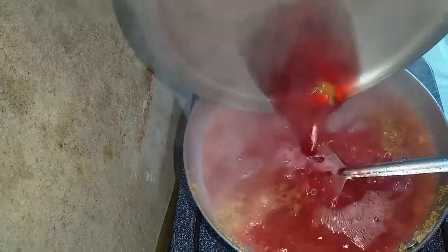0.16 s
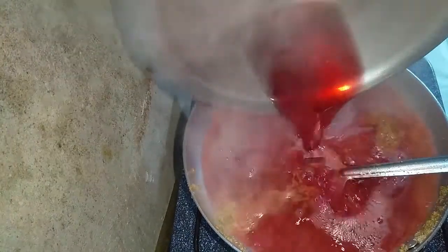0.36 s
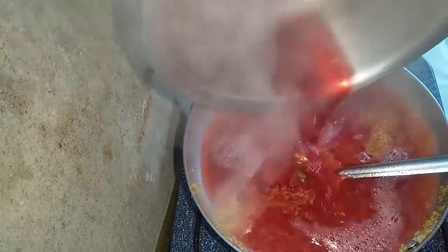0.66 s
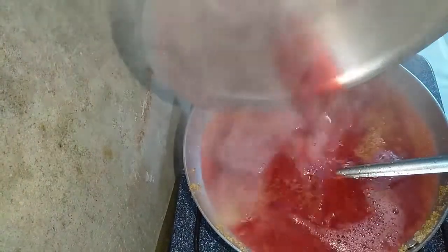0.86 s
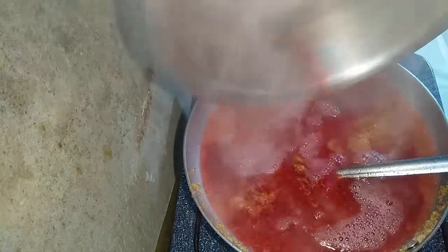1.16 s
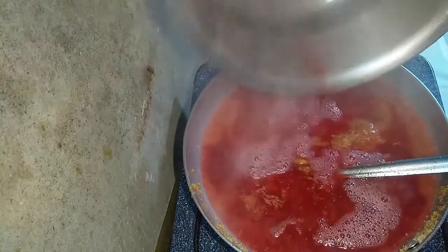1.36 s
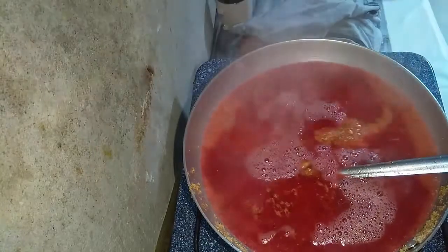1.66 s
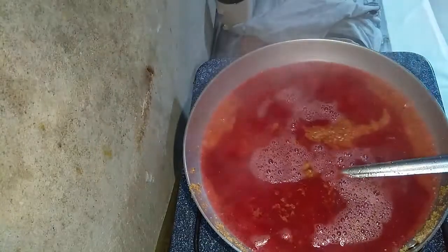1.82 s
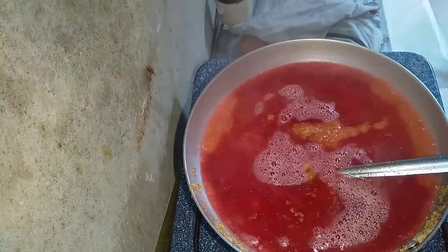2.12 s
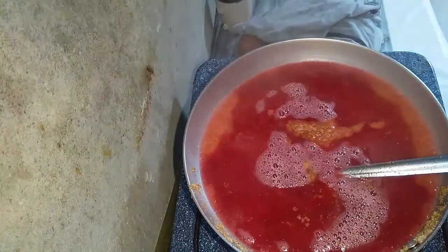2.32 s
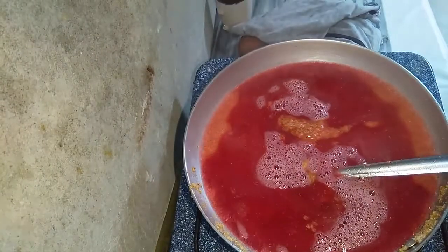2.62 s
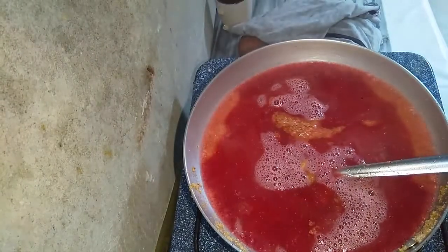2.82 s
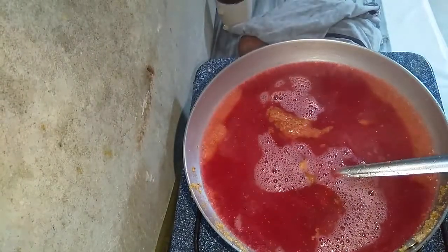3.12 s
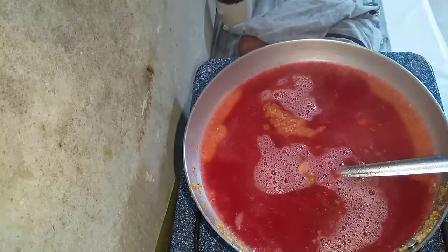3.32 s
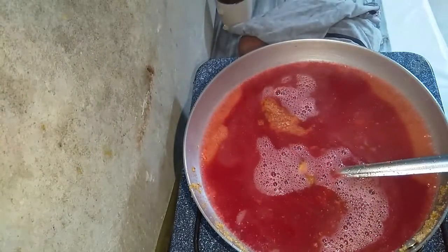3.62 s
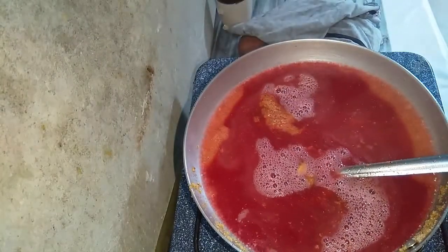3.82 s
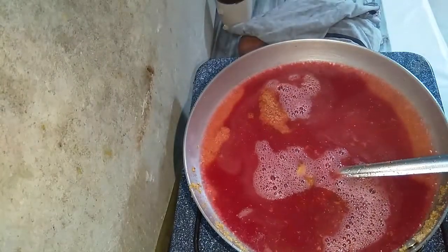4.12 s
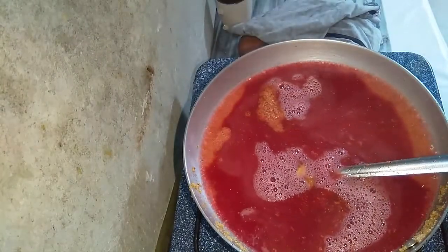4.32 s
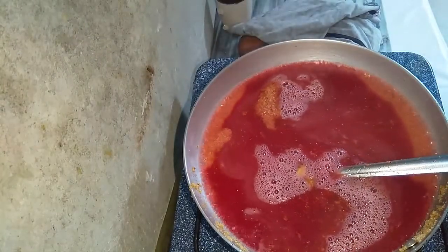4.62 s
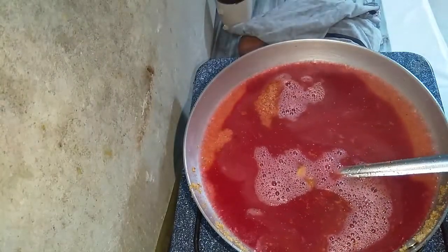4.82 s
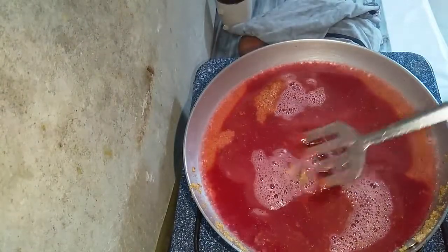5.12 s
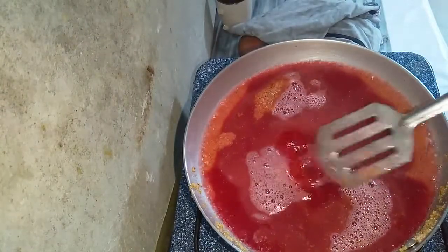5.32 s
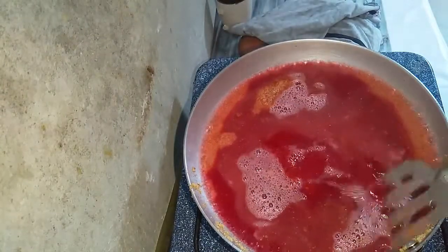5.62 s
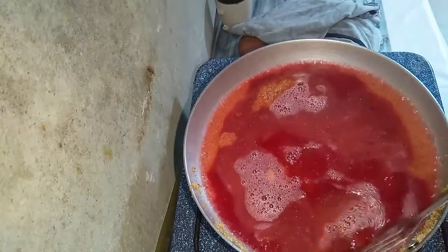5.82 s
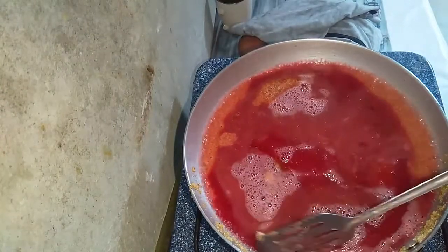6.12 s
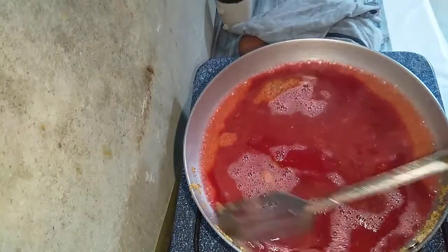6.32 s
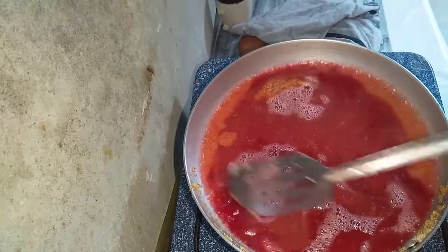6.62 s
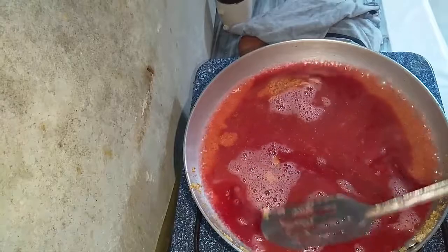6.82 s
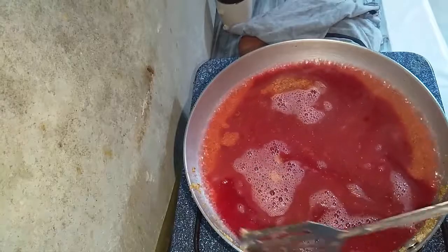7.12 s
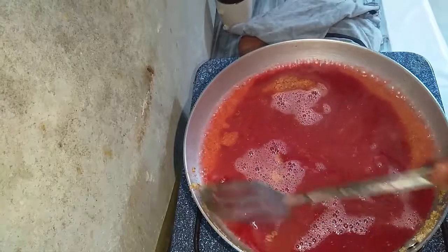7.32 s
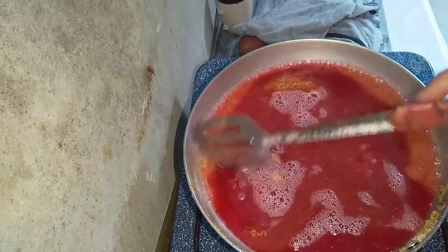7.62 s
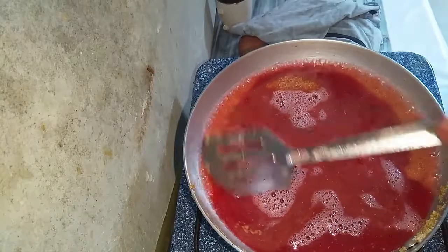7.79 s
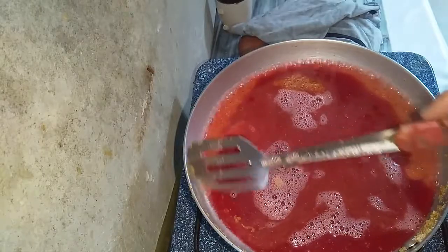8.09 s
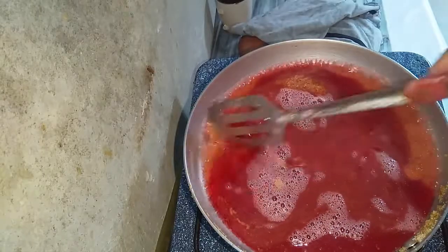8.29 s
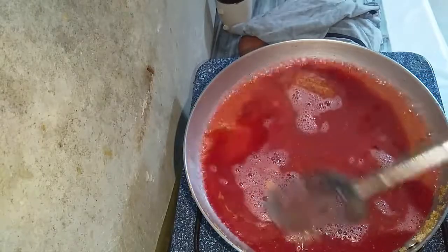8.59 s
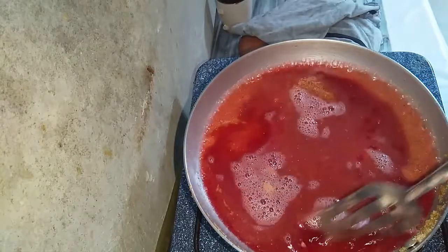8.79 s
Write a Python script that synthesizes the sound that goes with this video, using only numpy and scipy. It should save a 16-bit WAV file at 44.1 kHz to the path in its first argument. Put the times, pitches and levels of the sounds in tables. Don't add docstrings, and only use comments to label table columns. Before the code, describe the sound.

Hot syrup pours into a hot pan with a loud, bright sizzling fizz that steadily weakens, then a pot clangs down and a metal spatula knocks and scrapes.

```python
import sys
import numpy as np
from scipy import signal
from scipy.fft import rfft, irfft
from scipy.io import wavfile
from scipy.ndimage import uniform_filter1d, map_coordinates

SR = 44100
rng = np.random.default_rng(int(sys.argv[2]) if len(sys.argv) > 2 else 0)


def materialize(psi):
    bounded = np.clip(np.atleast_2d(psi).T, -1, 1)
    quanta = np.round(bounded * 32767).astype(np.int16)
    wavfile.write(sys.argv[1], SR, quanta)


def volts_from_db(level):
    exponent = np.asarray(level, float) / 20
    return 10 ** exponent


N = 394694

# t/s, level/dB
PAN_HEAT = [(0, -14.5), (.2, -16), (.32, -14.5), (.69, -16.5), (1.1, -20), (1.27, -21.5), (1.7, -22),
            (2.4, -24), (3, -25.5), (4, -27), (5.2, -30), (6.8, -32.5), (7.6, -35), (8.32, -36.5),
            (8.6, -34.5), (8.72, -38), (8.95, -37.5)]
# t/s, width/s,
# level/dB
FLARES = [(.2, 0.18, 2.5), (1.44, 0.13, -3), (1.62, 0.24, 5.5), (2.37, 0.6, -4), (2.59, .2, 5),
          (3.26, 0.18, 4.5), (3.89, 0.46, 3), (4.51, 0.4, 2), (5.11, 0.48, -4), (5.78, 0.13, 11),
          (6.23, .25, 3), (6.83, 0.28, 6), (8.32, 0.22, 1.5)]
# f/Hz, level per Hz/dB
LEFT_FIZZ = [(2300, -10), (2600, -9), (4000, -6.5), (5000, -8), (7000, -5.5), (9000, -2), (10500, 1),
             (12000, 3.5), (13500, 2.5), (15700, -6.5)]
# f/Hz, level per Hz/dB
RIGHT_FIZZ = [(2300, -12), (2600, -5.5), (4000, -5), (5000, -7.5), (6000, -6), (7000, -8.5), (9000, -6),
              (12000, -5.5), (14500, -5.5), (15700, 0)]
# f/Hz, likeness (1 same, 0 unrelated, below 0 opposed)
LIKENESS = [(60, 0.88), (124, 0.72), (400, 0.27), (1000, 0.28), (1550, 0.645), (2000, 0.25), (3700, 0.011),
            (4200, -0.17), (4800, -0.22), (5800, -0.33), (6300, -0.053), (9800, 0.077), (12000, 0.0018),
            (15700, -0.14)]
# f/Hz, level per Hz/dB
GURGLE_COLOUR = [(30, 8), (60, 6.5), (100, 2), (200, -5), (400, -8.5), (750, -10), (1300, -3), (1720, -5.5),
                 (1900, -18), (2500, 1.5)]
# f/Hz, left minus right/dB
GURGLE_LEAN = [(60, 0), (200, -1), (700, -1), (1300, -1), (2500, 8)]
# f/Hz, width/Hz, level/dB
HOLLOWS = [(126, 39, 7.5), (165, 11.5, 7), (368, 92, 8.5), (623, 44, 12), (863, 28, 7.5), (1131, 69, 5),
           (1354, 22.5, 10), (1581, 45, 6.5)]
# f/Hz, left minus right/dB, wander/Hz, phase between ports/rad, level/dB
POT_MODES = [(310, -8, 25, .3, -45), (425, -16, 8, .3, -27), (505, -5, 20, .5, -36), (592, -.6, 8, .9, -20),
             (694, -3, 12, .8, -28)]
# f/Hz, left minus right/dB, wander/Hz, phase between ports/rad, level/dB
POT_RIM = [(818, .3, 4, 1.1, -9)]
# t/s, held/s, level/dB, change while held/dB, tilt per octave/dB
POT_TOUCHES = [
    (3.246, .036, 0, 5, 0),
    (3.288, .042, -18, -2, 13),
    (3.335, .03, -41, -2, 22),
]
# t/s, held/s, level/dB, change while held/dB
RIM_TOUCHES = [
    (3.256, .03, -14, 2),
    (3.285, .016, -8, 8),
    (3.297, .026, 1.5, -17),
    (3.335, .03, -33, 7),
    (3.374, .012, -37, 0),
]
# f/Hz, left minus right/dB, wander/Hz, phase between ports/rad,
# level for flat blows/dB, level for edge blows/dB
PAN_MODES = [(227, -16, 3.86, .3, -30, -23), (291, -2, 17, .9, -26.5, -30.5),
             (446, -4, 19.5, 1.44, -35.5, -33), (654, -8, 90, 1.3, -55, -40), (868, -8, 7.4, .3, -48, -27),
             (1100, -4, 54, 1.7, -52, -39), (1550, -3, 140, 1.5, -52, -41)]
# f/Hz, left minus right/dB, wander/Hz, phase between ports/rad, level/dB
PAN_BELLY = [(358, -.6, 3, .16, -8.5)]
# t/s, held/s, level/dB, change while held/dB, tilt per octave/dB
FLAT_BLOWS = [
    (5.699, .04, -9.5, 7, -30),
    (5.75, 0.066, 2.5, -15.5, 1.5),
    (7.028, .075, -11, -12, -5),
    (7.63, .09, -33, -5, -8),
]
# t/s, held/s, level/dB, change while held/dB, tilt per octave/dB
EDGE_BLOWS = [
    (5.628, .04, -10, 2, -6),
    (7.995, .045, -10.5, -4, -10),
    (8.714, .026, -11, 10, .5),
    (8.89, .045, -21, 4, -1),
    (8.943, .03, -15, 3, -6),
]
# t/s, held/s, level/dB, change while held/dB
BELLY_TOUCHES = [(5.634, .11, -10, -6.5), (5.748, .037, -1.5, 1), (5.782, .024, -5.5, 2),
                 (5.804, .028, -7, .5), (5.93, .17, -49, -4), (7.028, .09, -28.5, 1), (7.64, .09, -53, 0),
                 (8.0, .05, -41, -8), (8.735, .038, -16, 1), (8.772, .034, -21, -4), (8.91, .03, -33.5, 3)]
# t/s, peak level/dB, time to fall 60 dB/s, bright share/dB, left minus right/dB
SPATULA_TAPS = [
    (5.6246, -15.5, 0.21, -8, -9.5),
    (5.648, -20.5, 0.17, -2, -0.5),
    (5.7463, -23.5, 0.18, -25, -3),
    (6.5187, -41, 0.15, -8, -12),
    (7.0294, -39, 0.24, 2, -1),
    (7.9897, -43, 0.2, -10, -2),
    (8.717, -19, 0.12, 8.5, -2),
    (8.7355, -29, 0.19, 5, -8),
    (8.9056, -30.5, 0.14, 4, -0.5),
]
# f/Hz, level per Hz/dB
TAP_COLOUR = [(300, -13), (900, -12.5), (1700, -15), (2000, 3), (2700, 9.5), (4000, 1.5), (4800, -6)]
# f/Hz, left minus right/dB, wander/Hz
STAND_MODES = [(63.8, -3, 7.9), (122.9, -2, 1.24), (176, -10, 9.7)]
# centre t/s, width/s, level/dB
STAND_BOOMS = [
    [(5.695, 0.065, -34), (5.785, 0.094, -37), (6.26, .1, -49.5), (6.89, 0.13, -49.5), (7.48, 0.11, -42.5),
     (7.59, 0.13, -44), (7.83, .08, -47), (7.95, .2, -49), (8.12, .12, -48), (8.785, 0.067, -33.5),
     (8.9, .07, -48)],
    [(5.72, .06, -43.5), (5.8, .12, -45), (5.96, 0.12, -51), (6.92, 0.11, -49), (7.25, 0.079, -52.5),
     (7.66, .14, -48), (7.87, 0.15, -25.5), (7.98, 0.13, -31), (8.12, 0.13, -24), (8.225, 0.036, -35),
     (8.735, 0.068, -43), (8.88, .16, -45)],
    [(5.72, .14, -45), (5.81, 0.13, -43.5), (5.96, 0.081, -48.5), (6.91, 0.056, -38.5), (7.02, 0.41, -48),
     (7.63, 0.11, -49.5), (7.74, 0.042, -49), (7.83, 0.085, -43.5), (8.02, 0.14, -36.5), (8.11, .08, -41),
     (8.245, 0.029, -42), (8.745, 0.055, -32), (8.92, 0.087, -43)],
]
# t/s, width/s, level/dB
HUM_SWAYS = [(.08, .15, -4.5), (.37, 0.17, 5), (.72, .15, -3), (.97, 0.16, 2), (2.22, 0.18, -2),
             (3.45, 0.27, -4.5), (4.22, 0.16, 5.5), (4.85, 1, -5), (5.46, 0.24, 4), (5.68, 0.17, -4),
             (6.72, 0.27, -17), (7.3, .25, -1.5), (7.85, 0.34, 6), (8.4, .25, -1)]


def fizz():
    gate_from_hz, gate_to_hz = 1866, 2502
    hz, t, z = bubbles()
    fine_db = np.interp(t, *np.transpose(PAN_HEAT))
    coarse_db = heated(t, hot_db=-26.5, slope=0.78, flare=0.13) + 5.1 * np.exp(-t / 0.1)
    gate_db = heated(t, hot_db=-35, slope=1.19, flare=1.03) - 3 * np.clip((t - 4.6) / 0.3, 0, 1)
    colour = np.array([read(LEFT_FIZZ, hz), read(RIGHT_FIZZ, hz)])
    fine = fine_db - band_db(colour, hz, 7000, 15500)
    coarse = coarse_db - band_db(colour, hz, 2500, 5000)
    gate = gate_db - band_db(colour, hz, 1900, 2300)
    blend = 1 / (1 + (hz[:, None] / 5660) ** 6)
    level = colour[:, :, None] + blend * coarse + (1 - blend) * fine
    gated = hz < gate_to_hz
    flutter = 1.47 * patches((2, 1, len(t)), bins=1, frames=16)
    port_db = [[[-12]], [[1.5]]]
    level[:, gated] = colour[:, gated, None] + gate + flutter + port_db
    level[:, hz < gate_from_hz] = -200
    level += 0.37 * patches((1, 1, len(t)), bins=1, frames=24)
    level += 2.0 * blend * patches(z.shape[1:], bins=4, frames=12)
    level += 2.58 * patches(z.shape, bins=1, frames=8)
    return back(z * volts_from_db(level), size=512)


def bubbles():
    hz, t, fat = paired(bursts(per_s=660, spread_db=2.0, t60=0.059, share=0.15), size=512)
    middling = paired(bursts(per_s=200, spread_db=4.0, t60=0.005, share=0.13), size=512)[2]
    tiny = paired(bursts(per_s=400, spread_db=3.5, t60=0.0033, share=0.21), size=512)[2]
    low, high = (1 / (1 + (hz[:, None] / f) ** 8) for f in (5930, 9900))
    return hz, t, np.sqrt(low) * fat + np.sqrt(abs(high - low)) * middling + np.sqrt(1 - high) * tiny


def bursts(per_s, spread_db, t60, share):
    sizes = volts_from_db(spread_db * np.minimum(rng.exponential(1, N), 5))
    pops = sizes * (rng.random(N) < per_s / SR)
    puff = signal.lfilter([1], [1, -np.exp(-np.log(1000) / (t60 * SR))], pops)
    return evened(1 + share * evened(puff)) * rng.standard_normal((2, N))


def heated(t, hot_db, slope, flare):
    cooling_db = np.interp(t, *np.transpose(PAN_HEAT)) + 16
    return hot_db + slope * cooling_db + flare * humps(t, FLARES)


def gurgle():
    hz, t, z = paired(bursts(per_s=65, spread_db=3.5, t60=0.052, share=0.36), size=2048)
    peaks = sum(db / (1 + (2 * (hz - f) / width) ** 2) for f, width, db in HOLLOWS)
    colour = read(GURGLE_COLOUR, hz) + peaks + 20 * np.log10(ports(read(GURGLE_LEAN, hz)))
    colour[:, hz > GURGLE_COLOUR[-1][0]] = -200
    level = heated(t, hot_db=-48, slope=0.76, flare=0.22) - band_db(colour, hz, 450, 1700) - 2.0
    bass = 1 / (1 + (hz[:, None] / 150) ** 2)
    level = level - 0.11 * bass * (level - level.min())
    uneven = 2.76 * patches(z.shape[1:], bins=3, frames=5)
    return back(z * volts_from_db(colour[:, :, None] + level + uneven), size=2048)


def pour():
    end_s, level_db, scatter_hz = 0.89, -35.5, 19
    t, out = np.arange(4000) / SR, np.zeros((2, N))
    favoured = [HOLLOWS[k][0] for k in (3, 5, 5, 6, 6, 7)]
    for when, pick, off, size in rng.random((70, 4)):
        hz = favoured[int(pick * len(favoured))] + scatter_hz * (2 * off - 1)
        tone = np.sin(2 * np.pi * hz * t) * volts_from_db(-60 * t / 0.069) * np.minimum(t / 0.0061, 1)
        loudness = volts_from_db(level_db + 9.3 * size - 9.8 * when)
        at = round(end_s * when ** 1.2 * SR)
        out[:, at:at + len(t)] += loudness * ports(-18.0)[:, None] * tone
    return out


def pot():
    return ringing(POT_MODES, POT_TOUCHES, tail_db=-20) + ringing(POT_RIM, RIM_TOUCHES, tail_db=-24)


def pan():
    flat = ringing(PAN_MODES, FLAT_BLOWS, tail_db=-3)
    edge = ringing(PAN_MODES, EDGE_BLOWS, tail_db=-7, order=1)
    return ringing(PAN_BELLY, BELLY_TOUCHES, tail_db=-9.5) + flat + edge


def taps():
    hz, t = np.fft.rfftfreq(8192, 1 / SR), np.arange(8192) / SR
    out = np.zeros((2, N + len(t)))
    body = volts_from_db(read(TAP_COLOUR, hz)) * (hz < 4800)
    high = hz > 4800
    for s, db, t60, bright_db, lean in SPATULA_TAPS:
        noise = rng.standard_normal((3, len(t)))
        shared = rfft(noise[:2] + noise[2])
        clank = evened(irfft(shared * (body + volts_from_db(bright_db - 5.5) * high * (hz < 9800))))
        tick = evened(irfft(shared * (body + volts_from_db(bright_db) * high)))
        sound = clank * volts_from_db(-60 * t / t60) + tick * volts_from_db(-3 - 60 * t / 0.025)
        attack = np.minimum(t / 0.0011, 1)
        out[:, round(s * SR):][:, :len(t)] += volts_from_db(db - 4.5) * ports(lean)[:, None] * sound * attack
    return out[:, :N]


def ringing(modes, touches, tail_db, order=0):
    out = np.zeros((2, N))
    first = round(touches[0][0] * SR)
    last = min(round((touches[-1][0] + 0.3) * SR), N)
    t = np.arange(first, last) / SR
    for hz, lean, wander, apart, *db in modes:
        octaves = np.log2(hz / modes[0][0])
        level = np.max([ring(t, octaves, tail_db - 7.0 * octaves, *row) for row in touches], 0)
        rattle_db = 0.8 * drift(len(t), per_s=59)
        level = level * volts_from_db(db[order] + rattle_db)
        out[:, first:last] += ports(lean)[:, None] * level * wavering(hz, wander, apart, count=len(t))
    return out


def ring(t, octaves, tail_db, s, held, db, change_db, tilt=0):
    rise_s, cut_s = 0.005, 0.035
    tail_s, tail_db_per_s = 0.072, -220
    last, end = db + change_db, held + tail_s
    drop = last + tail_db
    shape = np.interp(t - s, [0, held, held + rise_s, end, end + cut_s],
                      [db, last, drop, drop + tail_db_per_s * tail_s, drop - 80])
    return volts_from_db(shape + tilt * octaves) * np.clip((t - s) / rise_s, 0, 1)


def stand():
    first = round(5.5 * SR)
    out, t = np.zeros((2, N)), np.arange(first, N) / SR
    for (hz, lean, wander), rows in zip(STAND_MODES, STAND_BOOMS):
        level = humps(t, [(s, width, volts_from_db(db)) for s, width, db in rows], order=3)
        out[:, first:] += ports(lean)[:, None] * level * wavering(hz, wander, 0.1, count=len(t))
    return out


def hum():
    motor_hz = 123.2
    sway_db = humps(np.arange(N) / SR, HUM_SWAYS) + 0.73 * drift(N, per_s=29)
    level = volts_from_db(-49.5 + sway_db + 0.1)
    main = ports(-11)[:, None] * wavering(motor_hz, 1.85, 0.05, count=N)
    half_level = volts_from_db(-22 + 4 * drift(N, per_s=8))
    return level * (main + half_level * wavering(motor_hz / 2, 3.7, 2.4, count=N))


def wavering(hz, wander_hz, apart, count):
    turns = np.cumsum(hz + wander_hz * drift(count, per_s=30)) / SR + rng.random()
    gap = apart * (1 + 0.69 * np.tanh(drift(count, per_s=49))) * np.array([[-0.5], [0.5]])
    return np.sqrt(2) * np.sin(2 * np.pi * turns + gap)


def drift(count, per_s):
    knots = rng.standard_normal(int(count * per_s / SR) + 4)
    return map_coordinates(knots, [np.arange(count) * per_s / SR], order=3)


def humps(t, rows, order=2):
    return sum(height * np.exp(-abs(2 * (t - s) / width) ** order) for s, width, height in rows)


def patches(shape, bins, frames):
    field = rng.standard_normal(shape)
    return evened(uniform_filter1d(uniform_filter1d(field, bins, -2), frames, -1))


def paired(x, size):
    hz, t, z = signal.stft(x, SR, nperseg=size, noverlap=size * 3 // 4)
    same = np.clip(read(LIKENESS, hz), -1, 1)[:, None]
    return hz, t, np.array([z[0], same * z[0] + np.sqrt(1 - same ** 2) * z[1]])


def back(z, size):
    return signal.istft(z, SR, nperseg=size, noverlap=size * 3 // 4)[1][:, :N]


def band_db(colour_db, hz, lo_hz, hi_hz):
    inside = (hz > lo_hz) & (hz < hi_hz)
    return 10 * np.log10((volts_from_db(colour_db[:, inside]) ** 2).sum() / 4 / len(hz))


def read(points, hz):
    f, value = np.transpose(points)
    return np.interp(np.log(hz + 1), np.log(f + 1), value)


def ports(lean_db):
    pair = volts_from_db(np.array([lean_db / 2, -lean_db / 2]))
    return pair / pair.mean(0)


def evened(x):
    return x / np.sqrt(np.mean(x ** 2) + 1e-20)


def scene():
    return fizz() + gurgle() + pour() + hum() + pot() + pan() + stand() + taps()


def low_pass(x):
    return signal.sosfilt(signal.butter(12, 15740, fs=SR, output="sos"), x)


def record(dry):
    mix = np.clip(dry, -1, 1)
    return low_pass(mix)


dry = scene()
out = record(dry)
materialize(out)
```